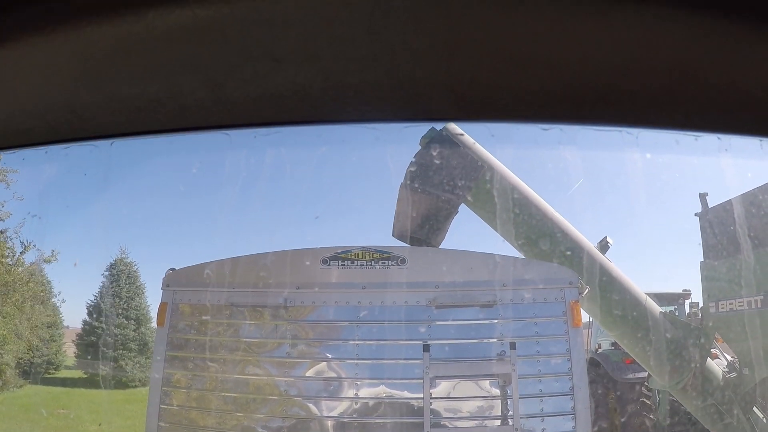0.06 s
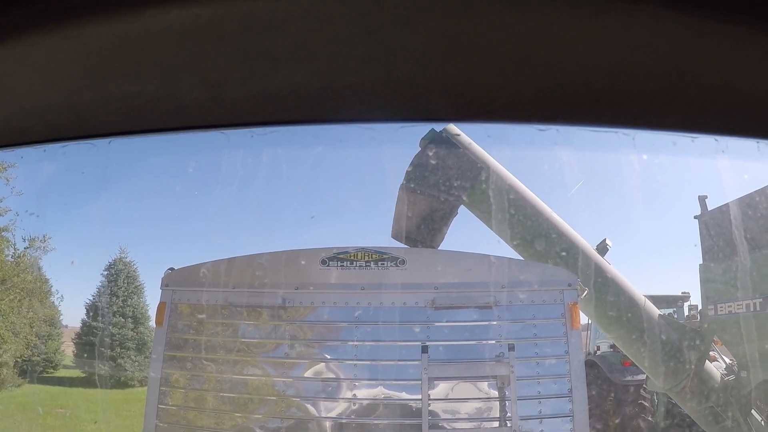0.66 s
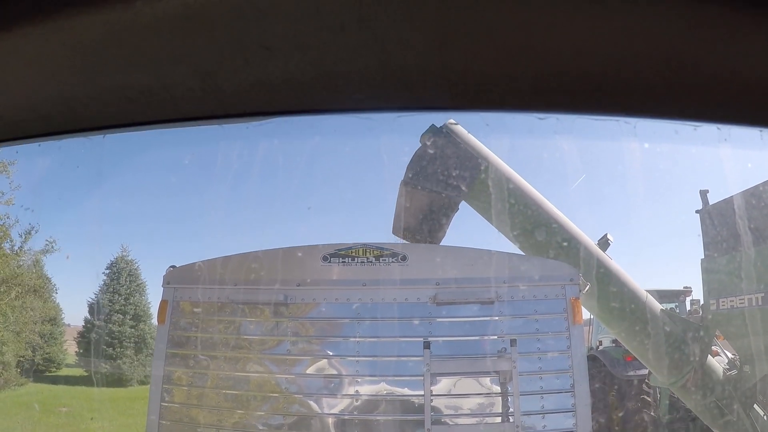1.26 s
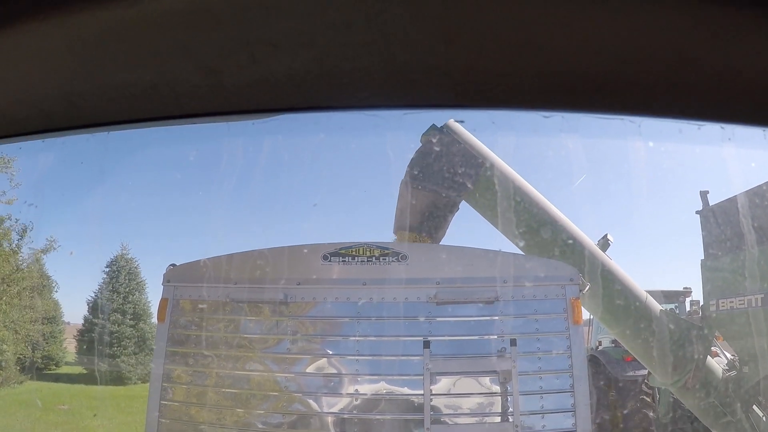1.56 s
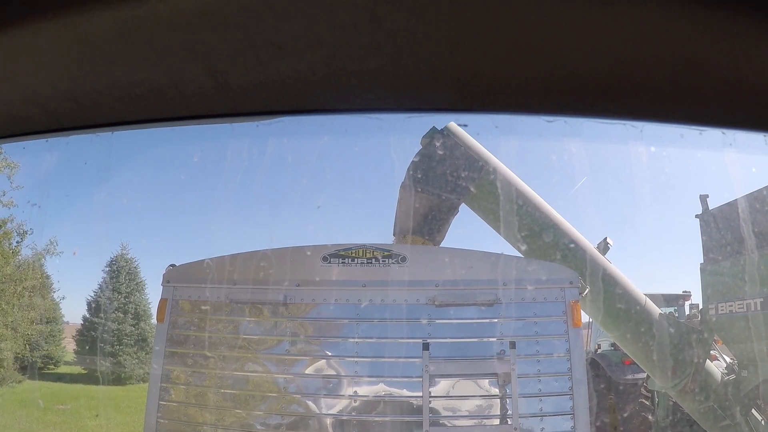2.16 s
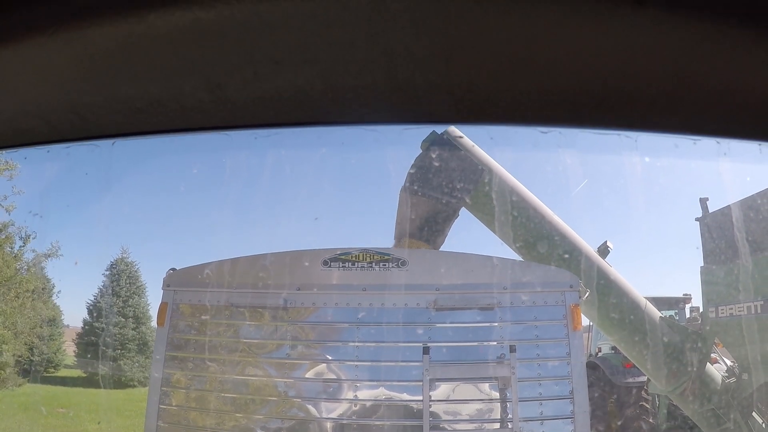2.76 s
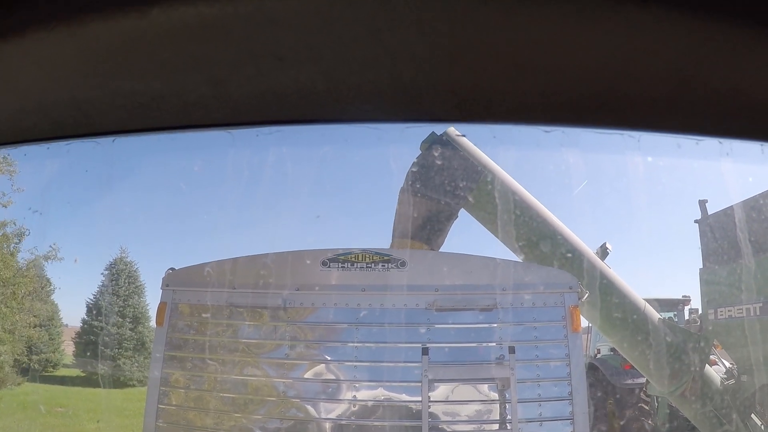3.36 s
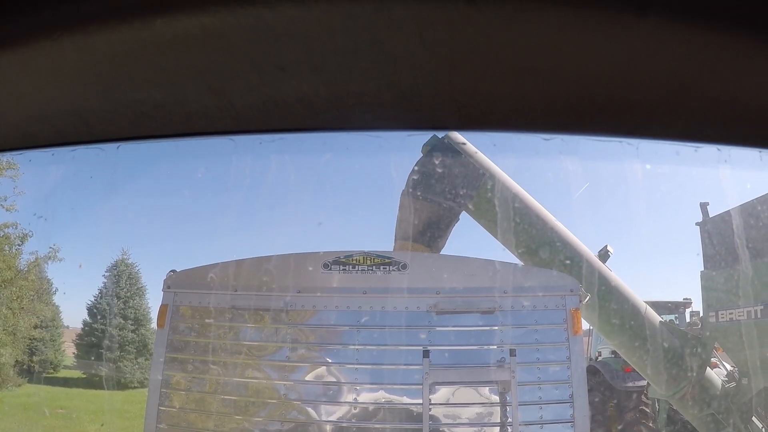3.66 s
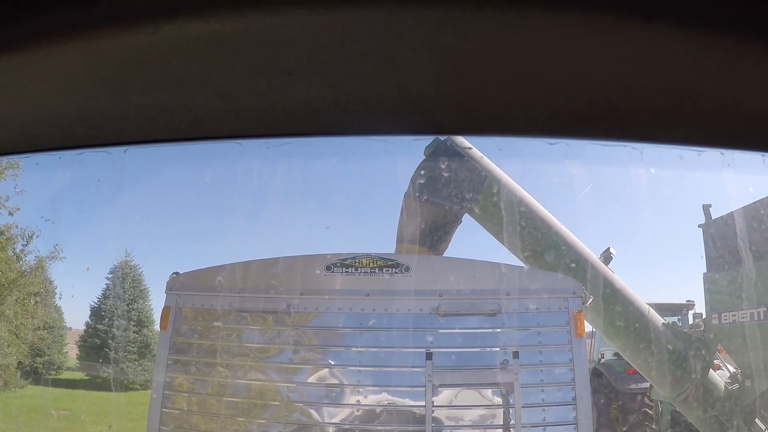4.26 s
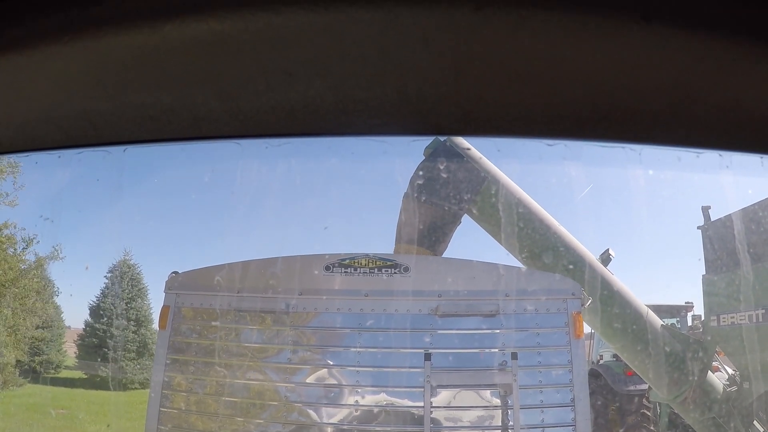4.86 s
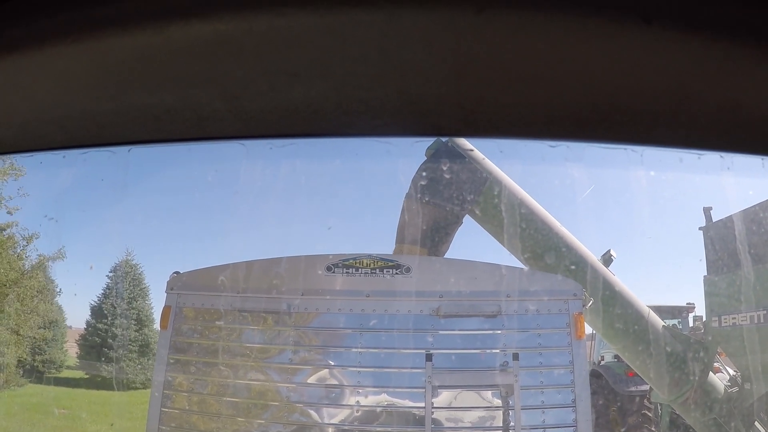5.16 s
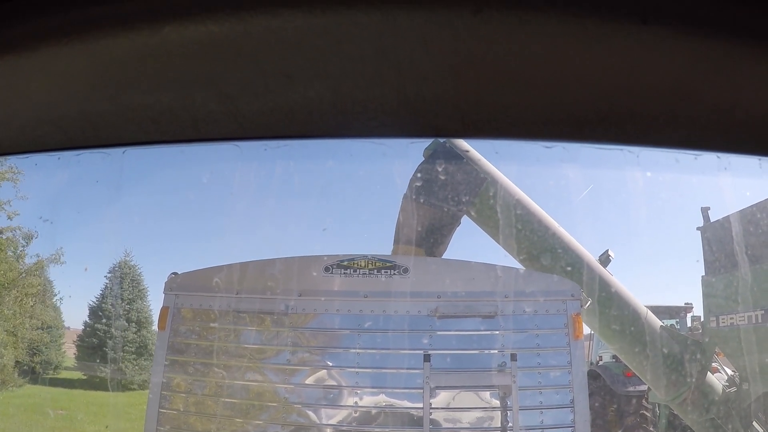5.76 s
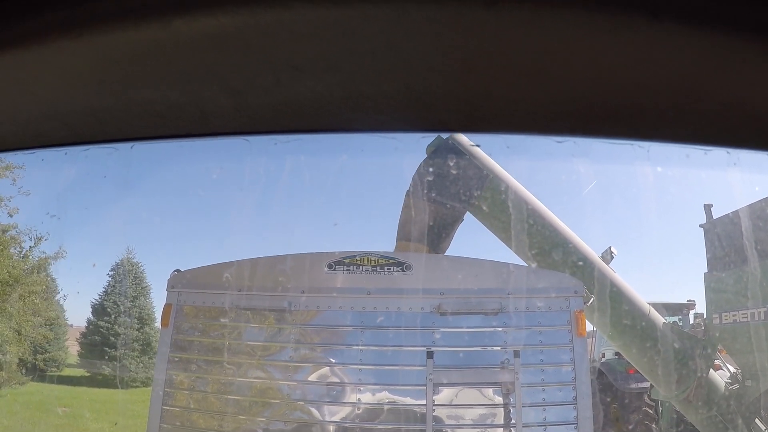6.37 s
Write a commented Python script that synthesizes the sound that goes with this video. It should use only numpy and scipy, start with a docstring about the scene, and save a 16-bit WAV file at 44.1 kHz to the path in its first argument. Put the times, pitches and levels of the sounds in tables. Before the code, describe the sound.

From inside a closed truck cab, a diesel engine idles with a low knock while fans blow and a tractor drones nearby. Grain from an auger starts to hiss and ring on the bare metal of the trailer, then turns into a duller, steady rush as it piles up. The cab rumbles under the load. About halfway, the tractor speeds up and its hum swells and throbs, then slowly eases.

```python
"""Inside an idling diesel truck while a tractor-driven auger (a screw conveyor) fills its trailer.
At first the engine knocks, fans rush, and the truck's hum beats against the tractor's drone.
Then kernels hiss brightly on the bare metal hopper and ring its panels. From about 2 seconds they
land more dully on their own heap, and soon the load sets the cab shaking. Just after 3 seconds
the tractor pulls up to working speed: the hums swell and throb, then slowly ease off."""
import sys
import numpy as np
from scipy import signal
from scipy.fft import rfft, irfft
from scipy.io import wavfile

SR = 44100
rng = np.random.default_rng(int(sys.argv[2]) if len(sys.argv) > 2 else 0)


def int16_out(signal):
    """Quantize to a 16-bit WAV file."""
    q = np.round(np.clip(np.atleast_2d(signal).T, -1, 1) * 32767)
    wavfile.write(sys.argv[1], SR, q.astype(np.int16))


N = 283563
TIME = np.arange(N) / SR
FREQS = np.maximum(np.arange(N // 2 + 1) * SR / N, 1)

# The truck's idle speed. Each row: time in seconds, cylinder firings per second.
IDLE_SPEED = [(0, 29.2), (.5, 29.65), (1.1, 29.6), (1.6, 29.3), (2.3, 29.2), (3, 29.4), (4.8, 29.35),
              (5.4, 29.75), (6.43, 29.75)]
# The engine's low tones. Each row: multiple of the firing rate, level in dB.
FIRING_TONES = [(1, -59), (2, -43), (4, -47.5), (6, -54)]
# Engine knock as it reaches the cab. Each row: frequency in Hz, relative level in dB.
KNOCK_SPECTRUM = [(20, -7), (45, -1), (68, -20), (88, -1.5), (103, 2.5), (120, -4.5), (152, 3.5),
                  (195, -15.5), (240, -7), (310, -12.5), (450, -22.5), (900, -36), (2000, -46.5)]
# The hum of a part the engine drives. Each row: multiple of its pitch, relative level in dB.
HUM_TONES = [(1, -30), (2, -44.5), (3, -57), (4, -62)]
# The tractor's pitch sags as the auger takes up the load, then climbs.
# Each row: time in seconds, Hz above the truck's hum (negative is below).
TRACTOR_OFFSET = [(0, 0), (.34, 3), (.85, 3.1), (1.15, 0), (1.5, -2.9), (2.25, -2.6), (2.88, 3.45),
                  (3.7, 4.9), (6.43, 4.95)]
# The grain stream builds to full flow. Each row: time in seconds, relative level in dB.
GRAIN_FLOW = [(0, -59.5), (.5, -55.5), (1.2, -55), (1.68, -49.5), (1.85, -45.3), (2.1, -43)]
# Kernels landing in the hopper. Each row: frequency in Hz, relative level in dB.
HOPPER_SPECTRUM = [(90, 23.5), (160, 11), (280, 13.5), (400, 11.5), (650, 11), (1100, 5), (1600, 5),
                   (2600, -2), (4000, 0.5), (5200, -1), (6600, 1), (8200, -4.5), (10000, -9.5),
                   (15000, -19.5)]
# The notes the empty hopper's panels ring at. Each row: pitch in Hz, width in Hz, relative level in dB.
PANEL_NOTES = [(147.6, 12, 4.5), (257.4, 7.8, 8.5), (366.5, 15.4, 3), (421.6, 8.1, -1), (462, 10, -1),
               (533.6, 15, -2.5), (662, 16, -16), (793, 10, -5), (1007, 28, -5.5)]
# Clumps of grain boom on the panels. Each row: time in seconds, added ring in dB against the usual ring.
CLUMPS = [(2.17, -3), (2.54, 3.5)]
# Spatters of stray kernels. Each row: time in seconds, level in dB.
SPATTERS = [(1.56, -55), (2.65, -46), (2.86, -45), (3.05, -48), (3.25, -47.5), (3.47, -48)]
# The cab shakes on its mounts as the load lands. Each row: time in seconds, level in dB.
SHAKE_LEVEL = [(0, -41), (1.75, -40.5), (2.7, -27), (3.3, -23.5), (4.1, -23), (4.55, -34), (5.15, -31),
               (5.8, -42), (6.43, -34)]
# Single lurches of the cab. Each row: time in seconds, level in dB.
LURCHES = [(0.48, -42), (2.55, -37), (2.66, -25.5), (2.98, -27), (3.1, -21), (3.63, -17), (3.7, -18),
           (3.88, -15), (4.02, -24), (5.48, -28), (6.28, -36.5)]
# The rush of the cab's fans. Each row: frequency in Hz, relative level in dB.
FAN_SPECTRUM = [(300, 2.5), (500, -4), (900, -5.5), (1200, -12.5), (1700, -13.5), (2300, -17), (3300, -8.5),
                (4200, -13), (5200, -20.5), (7000, -29), (10000, -30), (15000, -44)]
# Pitches the cab boosts or swallows. Each row: frequency in Hz, width in Hz, boost or cut in dB.
CAB_RESONANCES = [(506, 43, -3), (706, 27, -2.5), (874, 12, 2.5), (1160, 47, 1.5), (1258, 110, 3.5),
                  (1454, 106, -6), (1535, 41, 2), (1916, 62, 3.5), (2000, 45, -2), (2163, 42, 4.5),
                  (2430, 66, -2.5), (2513, 180, 4.5), (2870, 76, 3), (3530, 74, 5), (3555, 52, -7),
                  (3670, 76, 1.5), (4020, 70, -7.5), (4140, 42, 4.5), (4360, 43, 3.5), (4840, 70, 0),
                  (5840, 70, -4.5), (6020, 110, 3.5), (7300, 41, 1.5), (10130, 900, 2.5)]


def truck_engine(firings, knock_db=-34.5):
    """Six unequal cylinders fire in turn, making low tones and a knock that repeats every cycle."""
    cycle_position = (firings / 6) % 1
    points = 9000
    pattern = np.interp(cycle_position, np.arange(points) / points, rng.standard_normal(points))
    knock = shape_spectrum(pattern + rng.standard_normal(N), KNOCK_SPECTRUM)
    low_tones = tones(firings + 0.019 * wander(3.3), FIRING_TONES)
    # the frame rattles more once grain is falling
    load_db = np.interp(TIME, [1.2, 1.9, 4.4, 6.4], [-3.5, .6, .8, -1.5])
    return low_tones + set_level(knock, knock_db + load_db)


def beating_hums(firings, pull_s=3.31, rise_s=0.21, throb_db=6.5, ease_db_per_s=-1.67):
    """The truck's hum and the tractor's drone lie a few Hz apart, so together they pulse, or beat."""
    turns = 28 * firings / 6  # 28 vibrations per engine cycle
    beats = np.cumsum(curve(TRACTOR_OFFSET)) / SR
    # the hums grow as the tractor pulls up to speed, then ease as the load steadies
    pull = (1 + np.tanh((TIME - pull_s) / rise_s)) / 2
    ease_db = ease_db_per_s * np.maximum(TIME - pull_s, 0)
    hum = tones(turns, HUM_TONES[:1]) * gain(1.4 * wander(12.6))
    tractor = tones(turns + beats, [(1, -35.5)]) * gain(1.4 * wander(15))
    drone = (hum + tractor) * gain(-3.5 + 4.04 * pull + ease_db)
    # a raspy tone an octave up fades in; later it throbs with the beat, swooping up in each swell
    swell = pull * np.cos(2 * np.pi * (beats - 0.094))
    swoop = -0.17 * swell + 0.049 * wander(9)
    rasp_spectrum = [(200, -26), (255, -3.5), (300, 0), (380, -20), (900, -40)]
    rasp = set_level(shape_spectrum(rng.standard_normal(N), rasp_spectrum), -52)
    fade_in_db = -9 * (1 - settle(0, 0.52))
    octave_db = -2.5 + 3.5 * pull + ease_db / 2 + fade_in_db
    octave = tones(turns + swoop, HUM_TONES[1:2]) + rasp
    octave *= gain(octave_db + throb_db * swell + 2 * wander(3.3))
    # the higher tones waver in level and sink back as the tractor pulls
    whine = tones(turns, HUM_TONES[2:]) * gain(3.8 * wander(3) + 1.5 - 4.5 * pull)
    roughness = gain(1.5 * wander(34))
    return (drone + octave + whine) * roughness


def falling_grain(bare_s=1.8, heap_s=2.16):
    """Kernels drum on the hopper and ring its panels; on bare metal they ping, and a few fly wide."""
    # more and more kernels hit bare metal, until a heap softens the blows and covers the panels
    cushion_db = -5 * settle(heap_s, 0.69)
    cover_db = -9.5 * settle(heap_s, 1.95)
    bare_db = -16 * np.maximum(1 - TIME / bare_s, 0) + cover_db
    flow = gain(curve(GRAIN_FLOW) + cushion_db + 0.4 * wander(24))
    heap_hits = kernel_hits(per_second=120000, spread_db=1)
    metal_hits = kernel_hits(per_second=40000, spread_db=1)
    stray_hits = kernel_hits(per_second=9000, spread_db=2)
    drumming = set_level(shape_spectrum(heap_hits, HOPPER_SPECTRUM), 9)
    ringing = sum(gain(db) / (1 + 2j * (FREQS - hz) / width) for hz, width, db in PANEL_NOTES)
    panels = irfft(rfft(metal_hits) * ringing * np.exp(-(FREQS / 1500) ** 2), N)
    panels = set_level(panels, 5.5) * (1 + swells(CLUMPS, half_length_s=0.08))
    ping_spectrum = [(6000, -12), (8000, 0.5), (10000, 1.5), (12000, 1.5), (15000, -2)]
    pings = set_level(shape_spectrum(metal_hits, ping_spectrum), -1.7)
    spatter = shape_spectrum(stray_hits, [(2500, 11), (6500, 5), (11000, 0), (15000, -5)])
    spatter = set_level(spatter, 0) * swells(SPATTERS, half_length_s=0.027)
    return flow * (drumming + (panels + pings) * gain(bare_db)) + spatter


def kernel_hits(per_second, spread_db):
    """A dense hail of tiny impacts of uneven size, many of them overlapping."""
    counts = rng.poisson(per_second / SR, N)
    hits = np.sqrt(counts) * rng.standard_normal(N)
    return set_level(hits * gain(spread_db * rng.standard_normal(N)), 0)


def cab_shake(sway_hz=26.16, uneven_db=5.5, boom_hz=55, boom_end_s=0.24):
    """The cab rocks near its lowest resonance and lurches at times; a low boom dies away at the start."""
    turns = np.cumsum(sway_hz + 2.6 * wander(11.4)) / SR
    strength = gain(curve(SHAKE_LEVEL) + uneven_db * np.tanh(wander(7.1)))
    strength += swells(LURCHES, half_length_s=0.037)
    sway = set_level(np.sin(2 * np.pi * turns), 0) * strength
    boom_fade = (1 - np.tanh((TIME - boom_end_s) / 0.076)) / 2
    return sway + tones(boom_hz * TIME, [(1, -32)]) * boom_fade


def fans(air_db=-44.5):
    """Fans push air through the cab in a slightly unsteady rush."""
    rush = shape_spectrum(rng.standard_normal(N), FAN_SPECTRUM)
    return set_level(rush, air_db) * gain(0.17 * wander(4))


def cab_resonance(sound):
    """The small, closed cab makes some pitches louder and others softer."""
    boost_db = sum(db / (1 + (2 * (FREQS - hz) / width) ** 2) for hz, width, db in CAB_RESONANCES)
    return irfft(rfft(sound) * gain(boost_db), N)


def gain(db):
    """Turns decibels into a number to multiply by."""
    return 10 ** (np.asarray(db) / 20)


def set_level(sound, db):
    """Scales a sound to an average (rms) level."""
    return sound * gain(db) / np.sqrt(np.mean(sound ** 2))


def curve(table):
    """Joins (seconds, value) rows with straight lines."""
    return np.interp(TIME, *np.transpose(table))


def shape_spectrum(sound, points):
    """Filters a sound by (Hz, dB) points, fading out below the first one."""
    hz, db = np.transpose(points)
    response = gain(np.interp(np.log(FREQS), np.log(hz), db))
    bass_cut = np.minimum(FREQS / hz[0], 1) ** 2
    return irfft(rfft(sound) * response * bass_cut, N)


def wander(rate_hz):
    """A smooth random wobble with a typical size of 1."""
    smoothing = np.exp(-(FREQS / rate_hz) ** 2)
    return set_level(irfft(rfft(rng.standard_normal(N)) * smoothing, N), 0)


def tones(turns, rows):
    """Sine waves that follow a rotation, one for each (multiple, dB) row."""
    return sum(np.sqrt(2) * gain(db) * np.sin(2 * np.pi * multiple * turns) for multiple, db in rows)


def settle(start_s, time_s):
    """Rises from 0 at the start towards 1, ever more slowly."""
    return 1 - np.exp(-np.maximum(TIME - start_s, 0) / time_s)


def swells(events, half_length_s):
    """A smooth rise and fall for each (seconds, dB) row."""
    return sum(gain(db) * np.exp(-((TIME - s) / half_length_s) ** 2) for s, db in events)


def scene():
    """All the sources together, heard from inside the cab."""
    firings = np.cumsum(curve(IDLE_SPEED)) / SR  # running count of cylinder firings
    mix = truck_engine(firings) + beating_hums(firings) + cab_shake() + falling_grain() + fans()
    return cab_resonance(mix)[None]


def record(dry, top_hz=15150):
    """Cuts off the very highest treble steeply."""
    return signal.sosfilt(signal.ellip(12, .1, 80, top_hz, fs=SR, output="sos"), dry)


dry = scene()
out = record(dry)
int16_out(out)
```